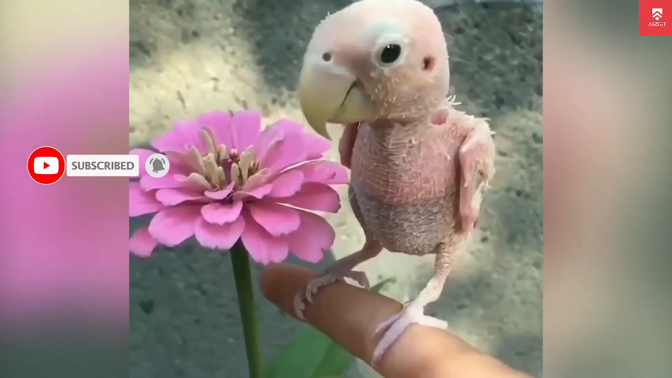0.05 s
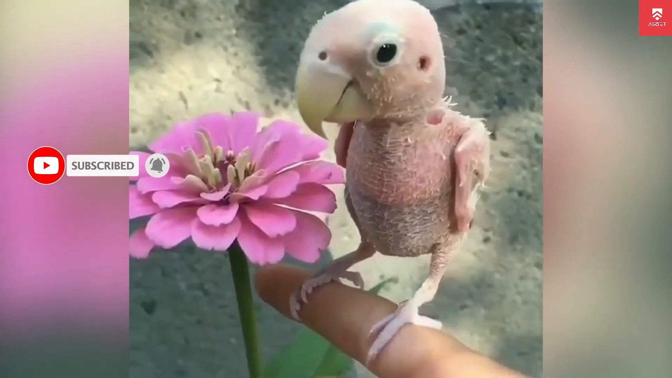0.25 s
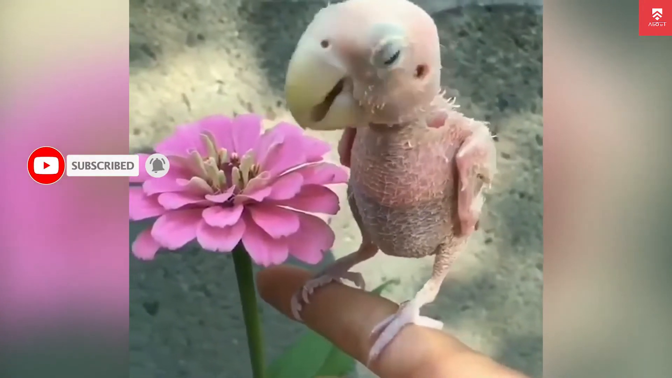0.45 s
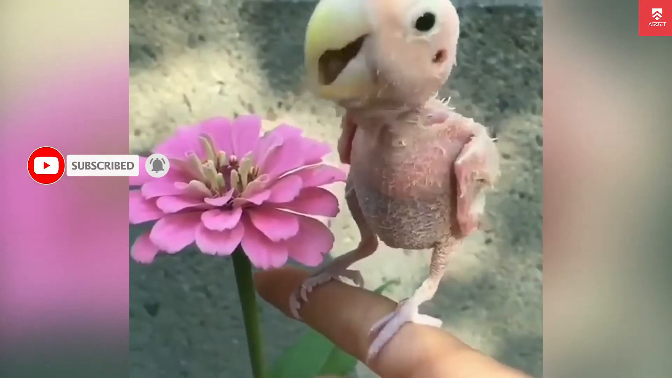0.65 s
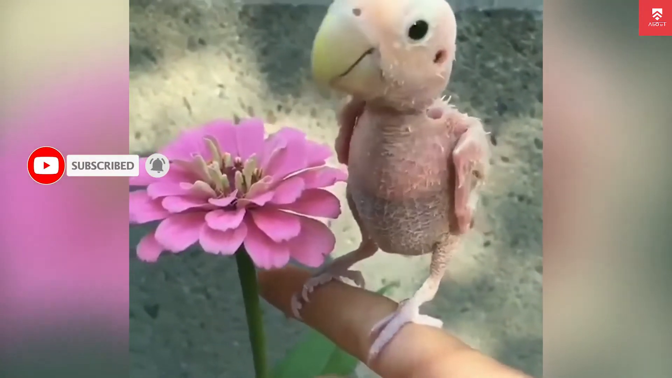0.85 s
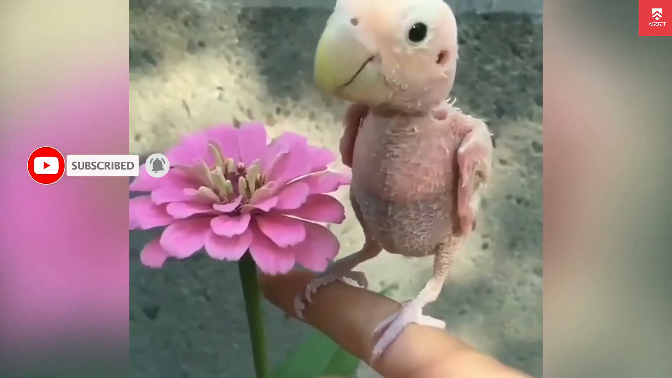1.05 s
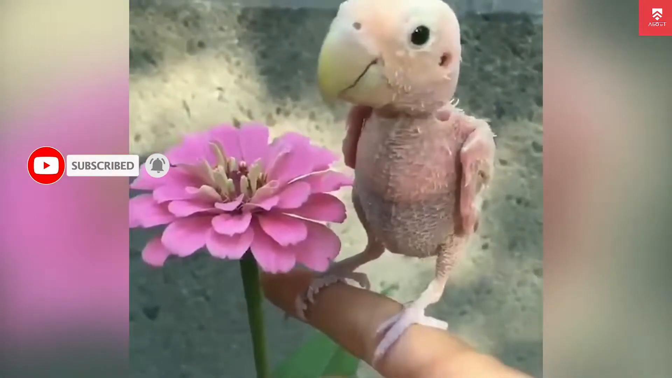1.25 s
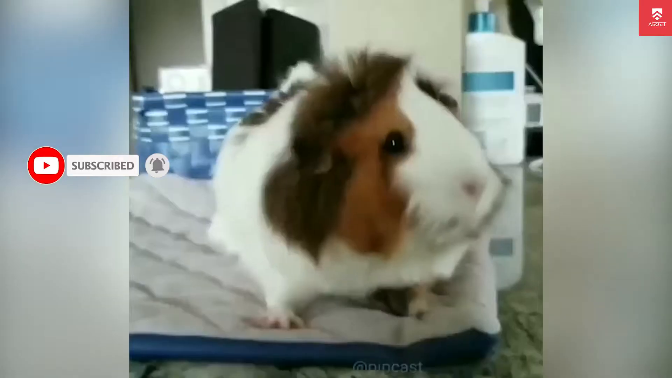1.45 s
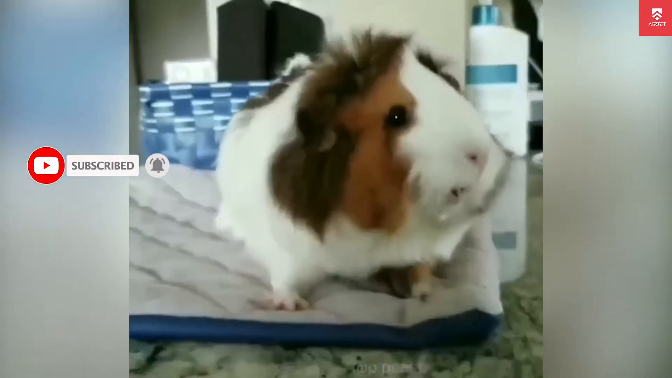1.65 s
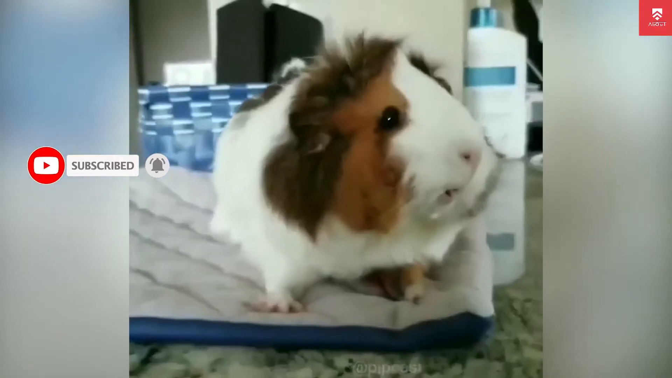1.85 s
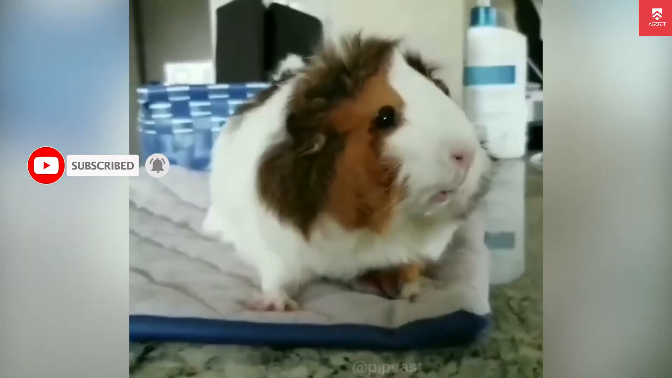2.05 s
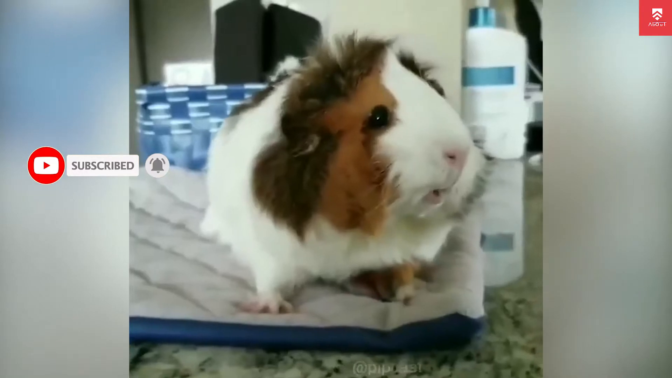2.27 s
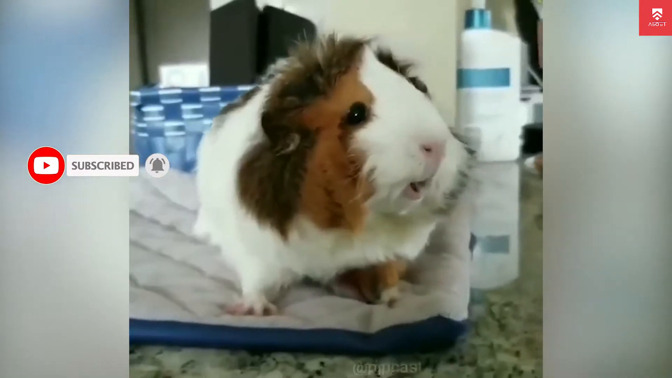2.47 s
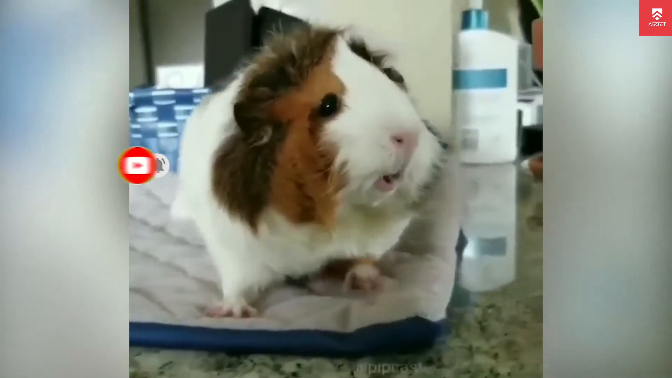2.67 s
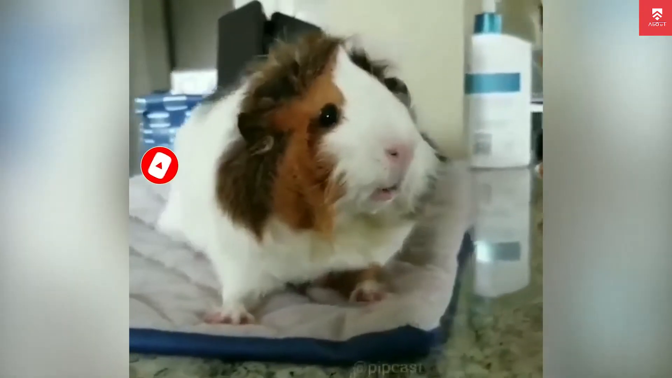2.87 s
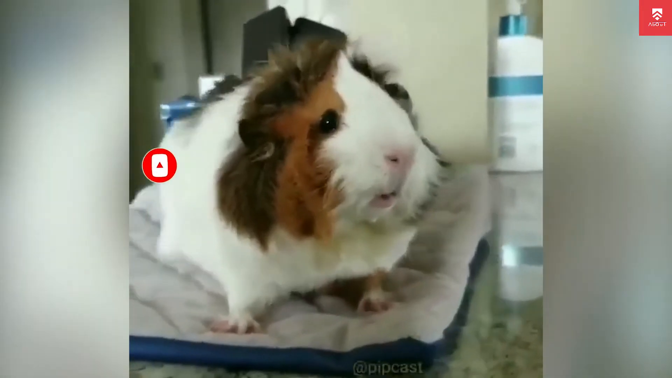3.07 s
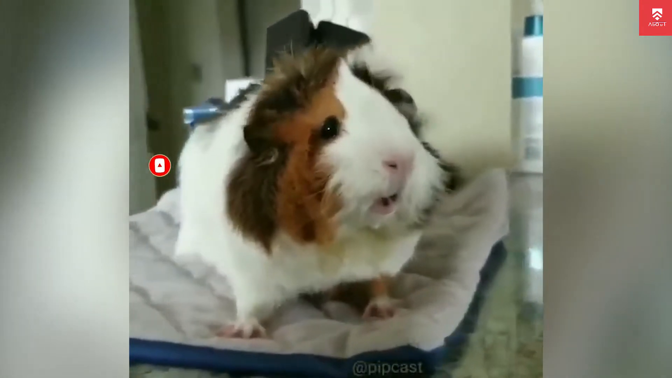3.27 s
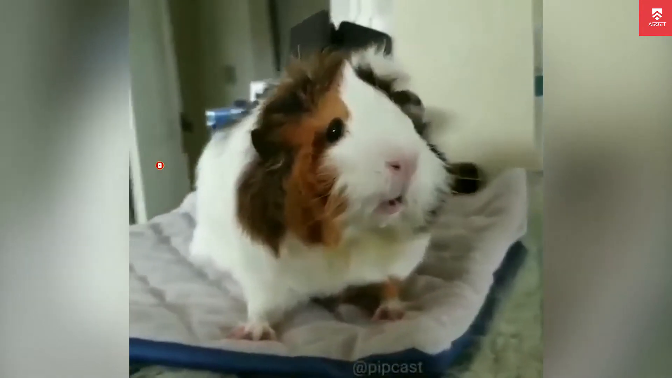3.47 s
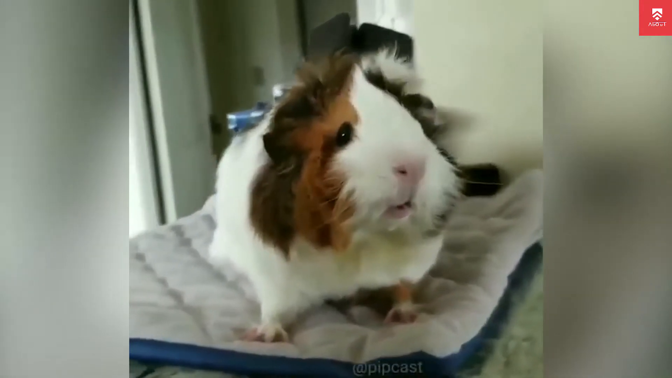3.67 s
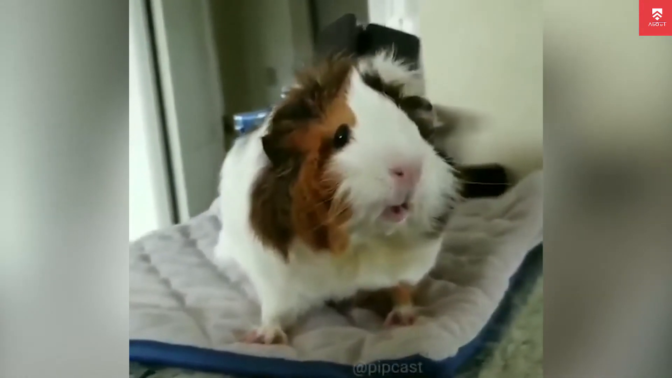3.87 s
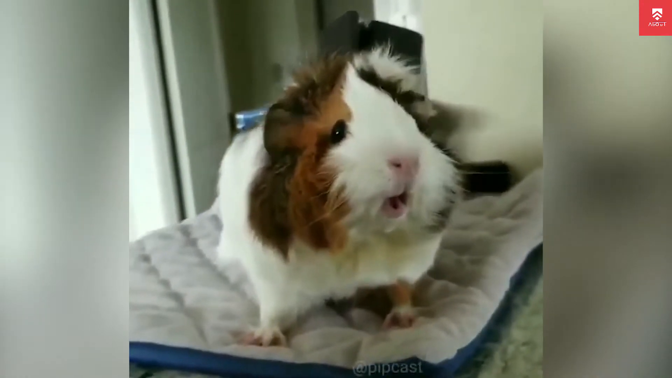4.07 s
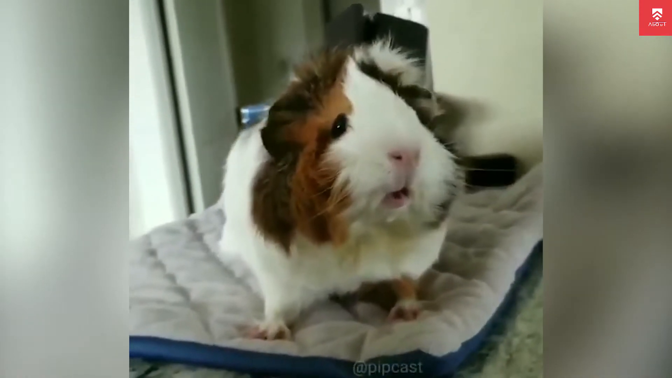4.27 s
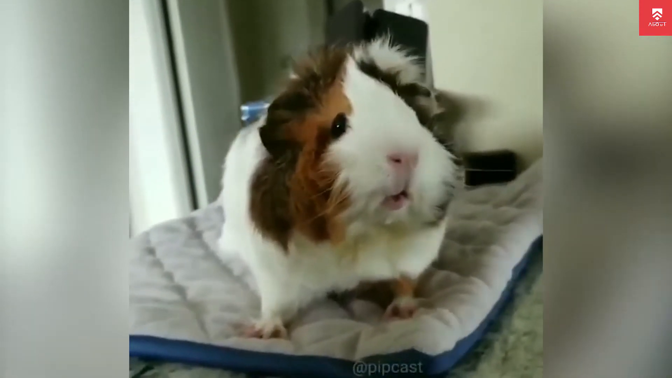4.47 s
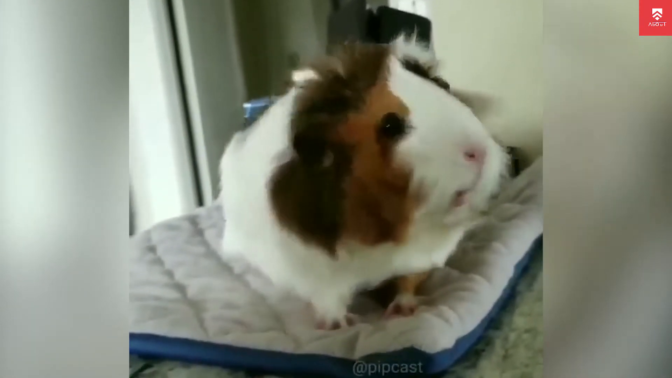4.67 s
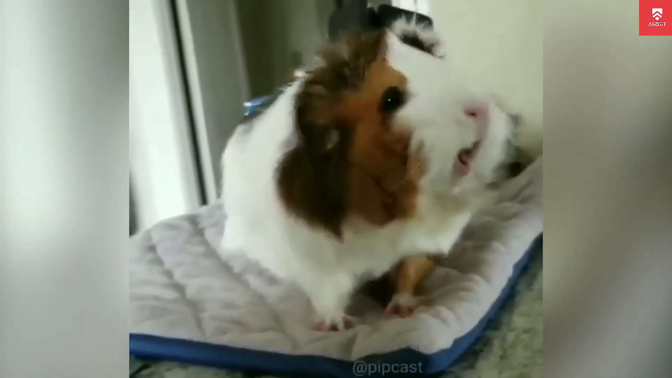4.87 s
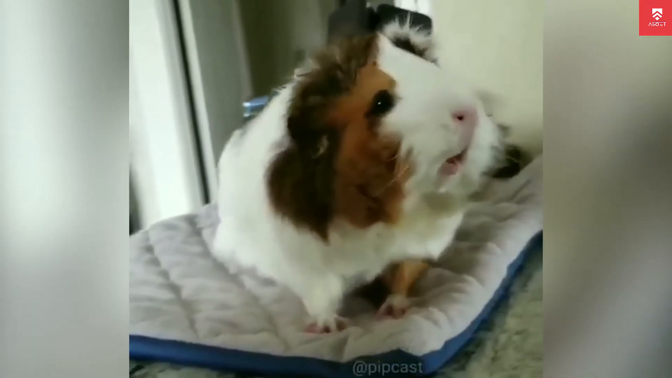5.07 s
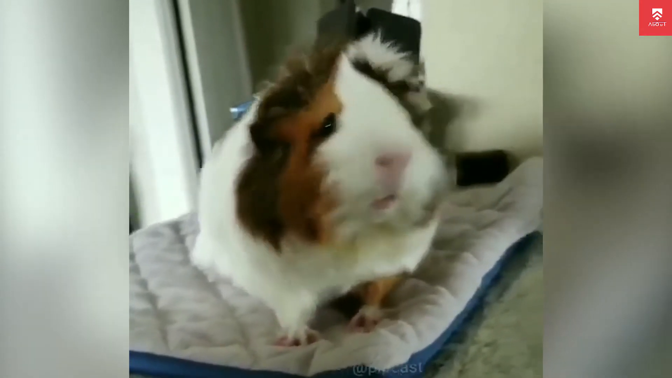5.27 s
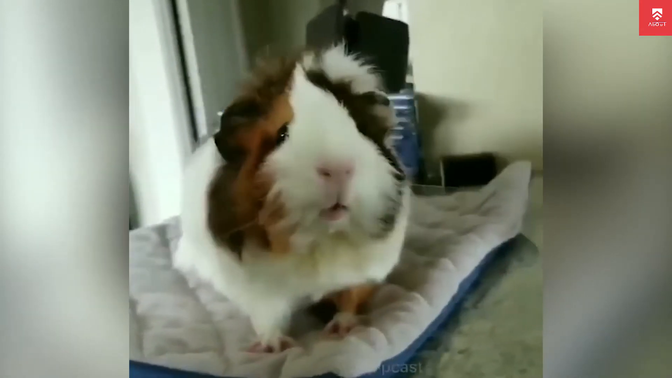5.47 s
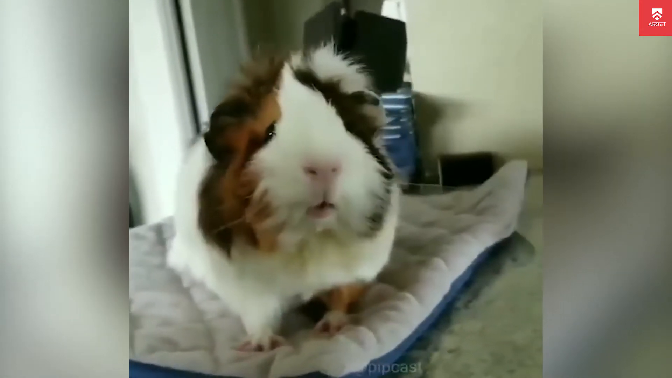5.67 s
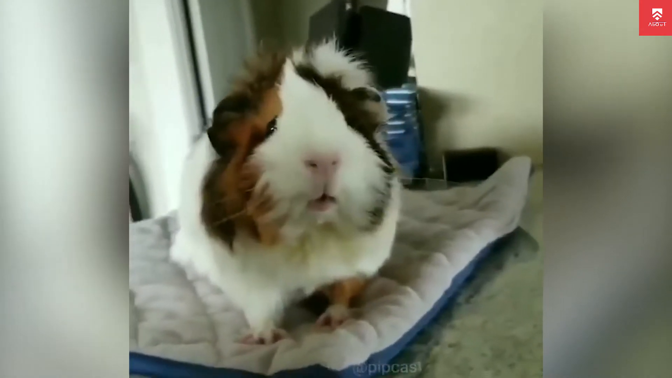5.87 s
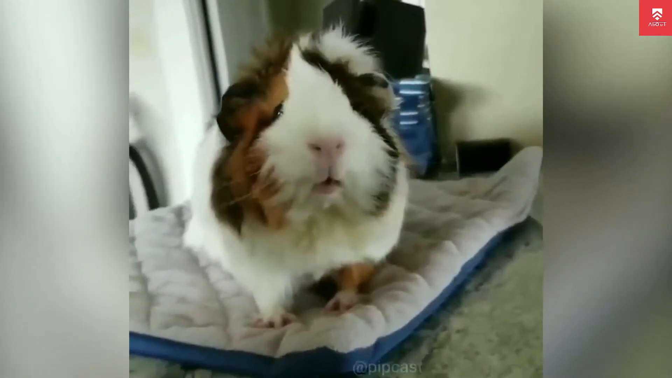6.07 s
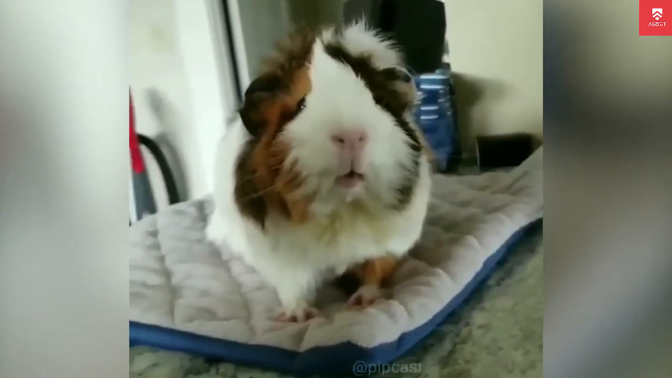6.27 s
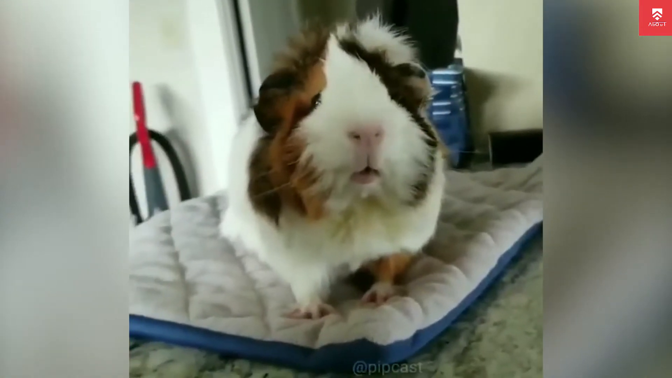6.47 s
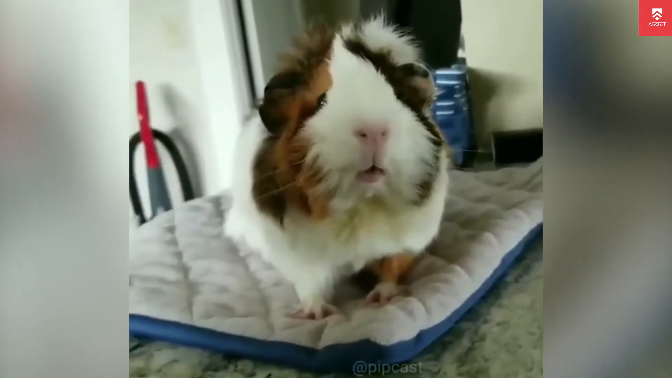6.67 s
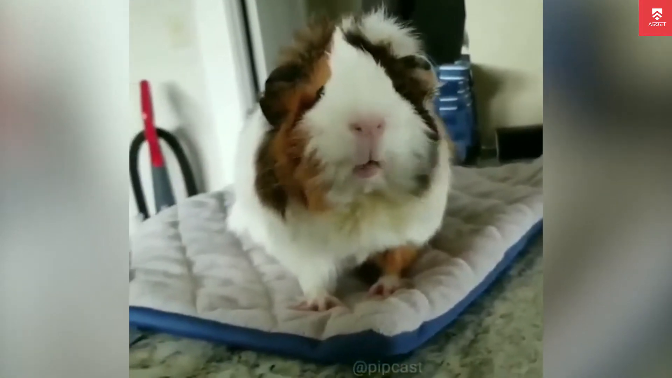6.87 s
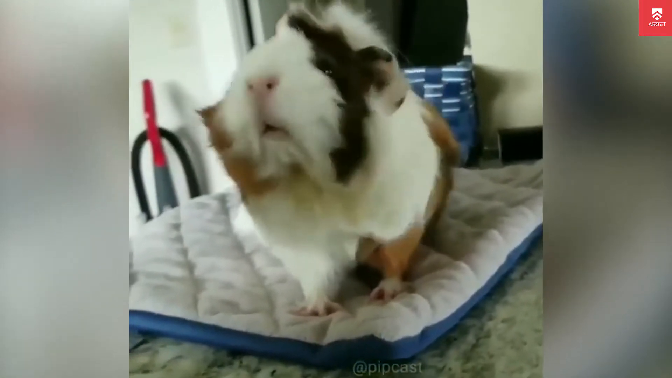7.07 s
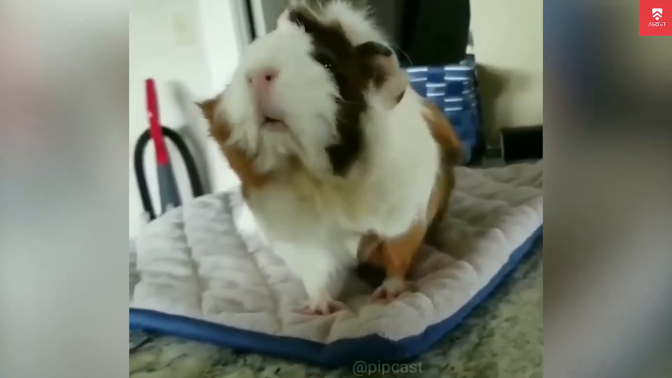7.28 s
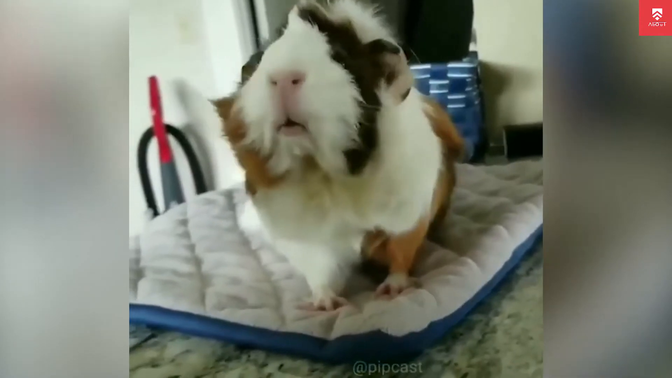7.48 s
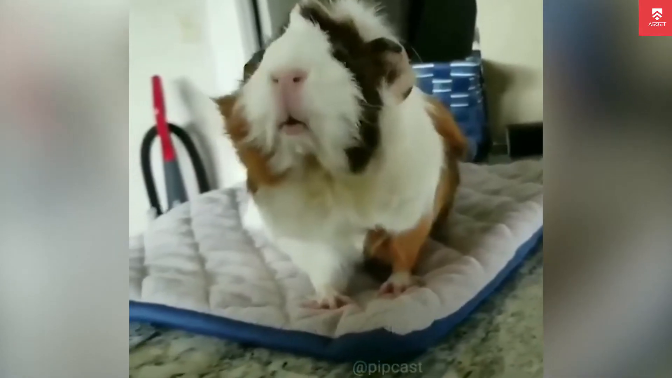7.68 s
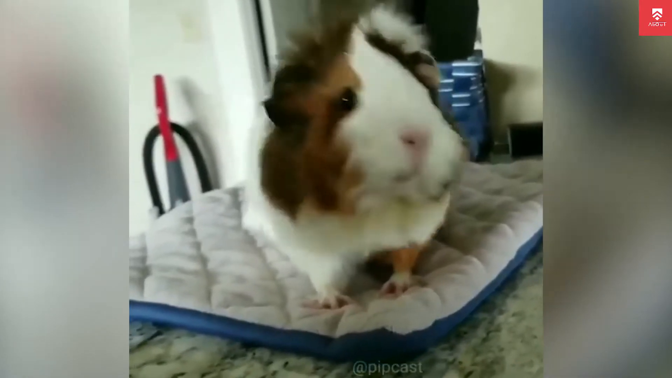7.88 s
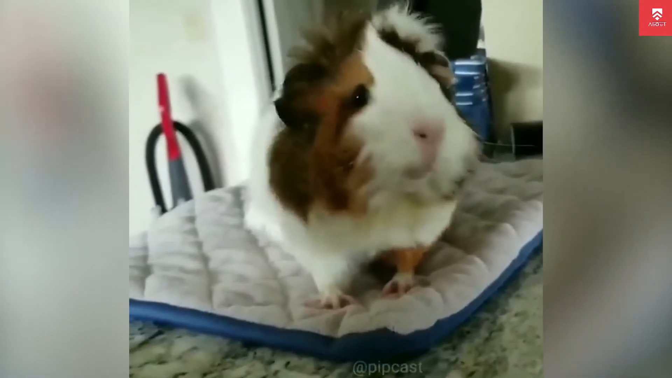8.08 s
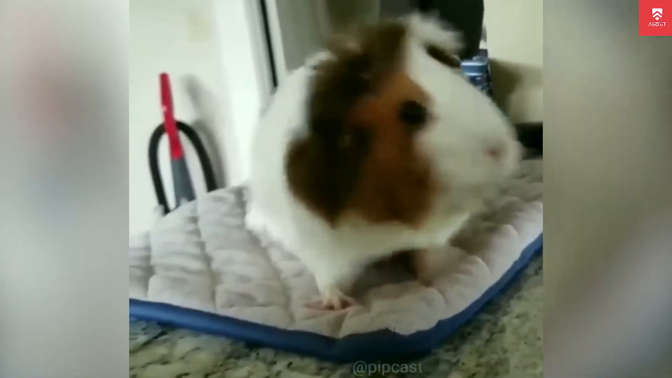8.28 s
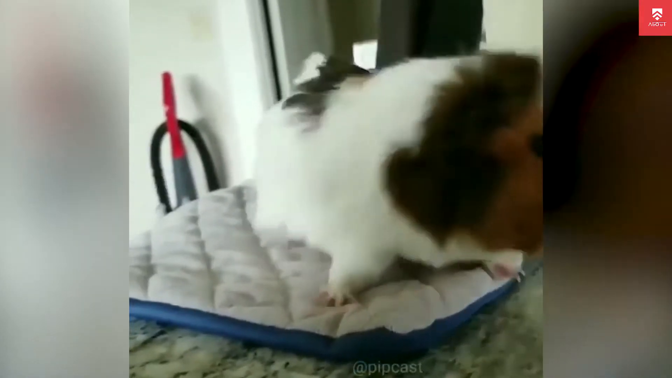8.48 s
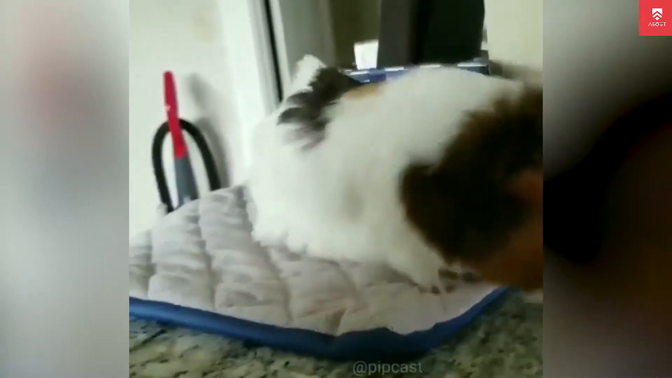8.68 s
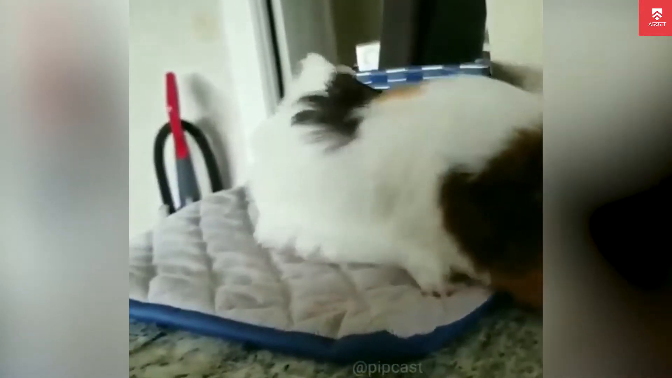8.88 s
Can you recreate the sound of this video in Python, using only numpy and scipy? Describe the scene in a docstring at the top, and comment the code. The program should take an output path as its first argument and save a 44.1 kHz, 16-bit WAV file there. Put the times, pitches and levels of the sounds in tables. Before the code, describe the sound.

Low outdoor rumble with a piercing bird squawk, a brief lull, then close guinea pig wheeks sweeping upward, fading into small chirps and claw scratches.

```python
"""A small parrot squawks once outdoors over a low rumble; after a short silence, a guinea pig on a mat
indoors whistles five loud rising wheeks and nine softer chirps, with shuffling and scratching on the cloth.
Both voices are stacks of sine waves on a moving pitch, shaped by a throat, with noise added around them.
Shaped noise makes the rumble, the room murmur, the rustling cloth and the short claw scratches."""
import sys
import numpy as np
from scipy import signal
from scipy.fft import rfft, irfft, next_fast_len
from scipy.io import wavfile
from scipy.ndimage import uniform_filter1d

SR = 44100
rng = np.random.default_rng(int(sys.argv[2]) if len(sys.argv) > 2 else 0)


def output_pcm(signal):
    """Save a mono or channel-first signal as 16-bit PCM at the path in sys.argv[1].

    Samples are clipped to [-1, 1] before scaling.
    """
    pcm = np.clip(np.atleast_2d(signal).T, -1, 1) * 32767
    wavfile.write(sys.argv[1], SR, np.round(pcm).astype(np.int16))


N = 393813

# how loud the outdoor rumble is: it drops during the squawk, then partly recovers: (time [s], level [dB])
OUTDOOR_RUMBLE = [(0.0, -40.5), (.266, -39.5), (.31, -39.5), (.346, -41.5), (.696, -41.5), (.724, -57.5),
                  (1.086, -52), (1.14, -47.5), (1.252, -50.5), (1.29, -48), (1.414, -45.5)]


def undb(db):
    """Turns decibels into a plain multiplier."""
    return 10 ** (np.asarray(db) / 20)


def unit(x):
    """Scales a sound to an average (RMS) level of 1."""
    return x / np.sqrt(np.mean(x ** 2))


def curve(table, edge_s=0.0011):
    """Columns joined by straight lines over time, and a gate that opens only over the table's span."""
    s, *columns = np.transpose(table)
    t = np.arange(N) / SR
    gate = np.clip(np.minimum(t - s[0], s[-1] + 2 * edge_s - t) / edge_s, 0, 1)
    return gate, [np.interp(t, s, c) for c in columns]


def passes(table, hz):
    """Reads the level in dB at a frequency from (Hz, dB) points."""
    table_hz, table_db = np.transpose(table)
    return np.interp(np.log(hz), np.log(table_hz), table_db)


def colour(x, spectrum):
    """Makes each frequency of a sound louder or softer by (Hz, dB) points."""
    size = next_fast_len(N)
    f = np.maximum(np.arange(size // 2 + 1) * SR / size, 1)
    return irfft(rfft(x, size) * undb(passes(spectrum, f)), size)[:N]


def walk(rate):
    """A random wandering value: a new target every 1 / rate seconds, joined by slopes, spread near 1."""
    hold = int(SR / rate)
    steps = np.repeat(rng.standard_normal(N // hold + 1), hold)
    return unit(uniform_filter1d(steps, hold)[:N])


def patchy(spectrum, flicker_db, rate):
    """Coloured noise whose octave bands flicker each on their own."""
    out = 0
    for hz in 30 * 2. ** np.arange(9):
        edges_hz = [hz / np.sqrt(2), min(hz * np.sqrt(2), .45 * SR)]
        sos = signal.butter(2, edges_hz, "bandpass", fs=SR, output="sos")
        band = signal.sosfilt(sos, rng.standard_normal(N))
        out = out + undb(flicker_db * walk(rate)) * band
    return unit(colour(out, spectrum))


def swells(rows):
    """Bell-shaped rises and falls of level, from (middle s, length s, dB) rows."""
    t = np.arange(N) / SR
    return sum(undb(db) * np.exp(-(2 * (t - s) / length) ** 4) for s, length, db in rows)


def echo(x, t60, top_hz, start_s):
    """Many blurred reflections: a noise tail that dies by 60 dB in t60 s, duller than the source."""
    t = np.arange(int(t60 * SR)) / SR
    tail = rng.standard_normal(N)[:len(t)] * np.exp(-np.log(1000) * t / t60) * (t > start_s)
    tail = signal.lfilter(*signal.butter(1, top_hz, fs=SR), tail)
    return signal.fftconvolve(x, tail / np.sqrt(np.sum(tail ** 2)))[:N]


def voice(notes, throat, fall_db, effort, reedy_hz, jitter, shimmer_db, drift_db, count, slew_s, firm_db,
          uneven=None):
    """Partials on a wavering pitch pass the throat; they fall off faster in soft calls, slower below reedy_hz."""
    # lines between the partials: (multiple of the pitch [times], depth under their layer [dB])
    half_lines = [(.5, 20), (1.5, -5), (2.5, 61), (3.5, 21)]
    quarter_lines = [(0.751, 3), (1.249, 9), (1.75, 3.5), (2.25, 11)]
    out = np.zeros(N)
    waver, shimmer = walk(300), undb(shimmer_db * walk(120))
    noise, drift = 1.3 * np.tanh(walk(900)), walk(20)
    half, quarter, rough = uneven or np.zeros((3, N))
    for note in notes:
        gate, (hz, db) = curve(note, edge_s=0.0013)
        on = gate > 0
        hz = uniform_filter1d(hz, int(slew_s * SR))  # the voice organ bends round corners
        hz = (hz * (1 + (jitter + 0.017 * rough) * waver))[on]
        db, chaos = db[on], noise[on]
        gate = (gate * shimmer)[on] * (1 + rough[on] * chaos)  # chaos blurs all lines
        phase = 2 * np.pi * np.cumsum(hz) / SR
        fall = (fall_db - effort * (db - firm_db)) * np.clip(hz / reedy_hz, .6, 1) ** 2  # dB an octave
        peak_db = db.max()
        base_db = db - throat(hz, hz, peak_db)
        partials = [(0.99, undb(db))]  # the lowest line sits 1 % flat
        for m in range(2, count + 1):
            own_drift = drift_db * np.roll(drift, m * SR)[on]  # each overtone drifts on its own
            overtone_db = base_db + throat(m * hz, hz, peak_db) - fall * np.log2(m) + own_drift
            partials.append((m, undb(overtone_db)))
        if uneven:  # unequal cycles put lines between the partials
            partials += [(m, half[on] * undb(-depth)) for m, depth in half_lines]
            partials += [(m, quarter[on] * undb(-depth)) for m, depth in quarter_lines]
        husk = np.clip((firm_db - db) / 40, 0, .5) * chaos  # a weakly driven voice has husky overtones
        for m, size in partials:
            size = size * np.abs(1 + husk * max(m - 1, 0)) * (m * hz < .4 * SR)
            out[on] += np.sqrt(2) * gate * size * np.sin(m * phase)
    return out


def guinea_pig():
    """Clean whistles with a little noise around the lines, in a small hard room."""
    # one table for each call: (time [s], pitch [Hz], level of the lowest partial [dB])
    wheeks = [
        [(1.485, 1577, -55.5), (1.535, 2114, -26.5), (1.571, 2340, -21), (1.629, 2543, -28), (1.67, 2700, -31),
         (1.685, 2700, -21), (1.692, 3005, -26.5), (1.728, 3250, -25), (1.794, 3490, -26), (1.841, 3770, -33),
         (1.862, 3770, -34)],
        [(2.018, 541, -39), (2.05, 493, -34.5), (2.116, 1232, -35.5), (2.138, 1461, -47), (2.215, 1730, -36.5),
         (2.285, 2127, -22), (2.36, 2280, -18.5), (2.41, 2380, -20.5), (2.45, 2500, -24.5),
         (2.504, 2594, -27.5), (2.514, 2970, -27), (2.53, 2870, -21), (2.542, 3340, -28), (2.661, 3650, -31.5),
         (2.686, 3670, -31.5)],
        [(2.792, 532.5, -36), (2.83, 538, -30.5), (2.884, 856, -37), (2.93, 1314, -34.5), (2.973, 1490, -43),
         (3.051, 2152, -23), (3.109, 2306, -21.5), (3.159, 2393, -23), (3.2, 2522, -21.5), (3.218, 2904, -26),
         (3.24, 3296, -27.5), (3.27, 3415, -24), (3.355, 3453, -23), (3.374, 3590, -27.5)],
        [(3.528, 612, -40.5), (3.56, 541, -32.5), (3.59, 657, -38.5), (3.64, 1288, -36.5), (3.72, 1516, -45),
         (3.849, 2087, -25), (3.955, 2290, -21), (3.993, 2417, -17), (4.075, 2521, -20.5), (4.096, 2710, -23.5),
         (4.102, 3260, -26), (4.138, 3535, -21.5), (4.189, 3820, -23.5), (4.197, 3640, -45)],
        [(4.338, 584, -45), (4.366, 527.6, -31.5), (4.396, 617, -38), (4.48, 1465, -43), (4.55, 1632, -34.5),
         (4.611, 1832, -32.5), (4.657, 2230, -21), (4.7, 2388, -21.5), (4.75, 2510, -18), (4.803, 2873, -23),
         (4.815, 3410, -23.5), (4.828, 3640, -29.5), (4.867, 3646, -23), (4.919, 3654, -28.5)],
        [(5.155, 537, -41.5), (5.189, 469, -36), (5.235, 637, -39.5), (5.265, 892, -40.5), (5.341, 1223, -39),
         (5.447, 1396, -46), (5.563, 1338, -43), (5.627, 1223, -39.5), (5.661, 1300, -45), (5.685, 1627, -56)],
        [(5.9, 624, -49.5), (5.928, 597, -44), (5.958, 685, -45.5), (6.002, 1100, -43), (6.052, 1160, -43),
         (6.162, 1278, -43), (6.19, 1330, -46)],
        [(6.348, 634, -44), (6.38, 594, -38.5), (6.406, 683, -41.5), (6.44, 1040, -43), (6.49, 1085, -41),
         (6.622, 1323, -40.5), (6.66, 1420, -52)],
        [(6.8, 655, -43.5), (6.828, 573, -40.5), (6.852, 622, -40), (6.922, 1057, -42), (6.964, 1230, -41.5),
         (7.002, 1630, -49), (7.05, 1644, -55), (7.065, 1640, -48), (7.1, 1770, -55)],
        [(7.19, 667, -44), (7.23, 548, -39), (7.27, 721, -43.5), (7.294, 1103, -45), (7.324, 1600, -49),
         (7.335, 1600, -65)],
        [(7.69, 577, -47), (7.72, 509, -44), (7.748, 610, -44.5), (7.79, 1090, -45.5), (7.86, 1175, -40),
         (7.9, 1410, -43.5)],
        [(8.02, 622, -42.5), (8.048, 547, -40.5), (8.07, 626, -42.5), (8.112, 1106, -42), (8.164, 1232, -39),
         (8.298, 1370, -45), (8.318, 1427, -44.5), (8.362, 1970, -48.5), (8.385, 1943, -52)],
        [(8.49, 598, -40), (8.53, 565, -40.5), (8.552, 797, -37.5), (8.59, 1424, -40)],
        [(8.88, 575, -47), (8.894, 558, -37.5), (8.93, 603, -41.5)],
    ]
    # colour of the room's echo: (frequency [Hz], level [dB])
    room = [(300, -8.5), (1200, -5.5), (2000, -8), (2600, 0), (3300, -6.5), (5500, -8.5), (13000, -4.5)]
    call = voice(wheeks, mouth, fall_db=13, effort=0.061, reedy_hz=703, jitter=0.0051, drift_db=2.0,
                 shimmer_db=1.02, count=8, slew_s=0.0072, firm_db=-39.5, uneven=registers())
    halo = call * (undb(-27.5) * walk(700) + undb(-50.5) * walk(3500))  # narrow noise surrounds each partial
    reflections = colour(echo(call, 0.4, 8700, 0.004), room)
    return call + halo + puffs() + undb(-10.5) * reflections


def mouth(hz, pitch_hz, peak_db):
    """What reaches the air at hz: in loud calls the mouth opens as the pitch climbs."""
    # what the throat and open mouth let through: (frequency [Hz], level [dB])
    open_mouth = [(500, 4.5), (1100, 4.5), (1700, -7.5), (2400, -1), (3500, -8.5), (5100, 14.5),
                  (6900, -0.5), (9000, -1.5), (11000, -1), (13500, -16)]
    # the same with the mouth nearly shut: (frequency [Hz], level [dB])
    shut_mouth = [(500, 2.5), (1100, 1.5), (1700, -9), (2600, 2), (3300, -4), (4000, 5), (5200, -6),
                  (7000, -17), (13500, -22)]
    opens_from_hz, open_at_hz, loud_db = 1000, 1600, -29
    opening = np.clip((pitch_hz - opens_from_hz) / (open_at_hz - opens_from_hz), 0, 1) * (peak_db > loud_db)
    return opening * passes(open_mouth, hz) + (1 - opening) * passes(shut_mouth, hz)


def registers():
    """Strength of alternating cycles, four-cycle patterns and chaos where the voice breaks upward."""
    # each row holds two groups, the times of a break into the upper register and its strengths:
    # (break [s], end of call [s], cycles alternate from [s], until [s]),
    # (every-2nd-cycle level [dB], every-4th-cycle level [dB], chaos [dB])
    breaks = [ ((1.688, 1.862, 1.815, 1.845), (-26, -44, -15)), ((2.512, 2.686, 2.535, 2.68),
              (-27, -37.5, -17.5)), ((3.21, 3.374, 3.24, 3.35), (-56, -51, -38)),
              ((4.098, 4.197, 4.128, 4.16), (-26, -41, -26)), ((4.803, 4.919, 4.812, 4.905),
              (-32, -34, -19)), ]
    chaos_db, chaos_s = -5, 0.0096  # irregular cycles at the break and the end, and their time to settle
    t, half, quarter, rough = np.arange(N) / SR, np.zeros(N), np.zeros(N), np.zeros(N)
    for (start, end, first, last), (half_db, quarter_db, calm_db) in breaks:
        edges = np.exp(-np.abs(t - start) / chaos_s) + np.exp(-np.abs(t - end) / chaos_s)
        upper = np.clip(np.minimum(t - start, end - t) / 0.0055, 0, 1)
        half += undb(half_db) * np.clip(np.minimum(t - first, last - t) / 0.01, 0, 1)
        quarter += undb(quarter_db) * upper * (0.62 + edges)
        rough += undb(chaos_db) * edges + undb(calm_db) * upper
    return half, quarter, rough


def puffs():
    """Raspy breath noise that swells quickly as each call opens, then fades as the whistle takes hold."""
    # one puff a call, levels relative to each other: (start [s], strength [dB])
    puff_rows = [(1.4865, -25), (2.0288, -31), (2.7964, -20.5), (3.5294, -25.5), (4.3306, -27.5),
                 (5.1564, -22.5), (5.9024, -57), (6.354, -39), (6.803, -42), (7.1935, -39), (7.6779, -44),
                 (8.0194, -43), (8.4944, -33), (8.8872, -35)]
    swell_s, fade_t60_s = 0.016, 0.61
    t, level = np.arange(N) / SR, np.zeros(N)
    for s, strength_db in puff_rows:
        age = np.maximum(t - s, 0)
        level += undb(strength_db) * np.minimum(age / swell_s, 1) * np.exp(-np.log(1000) * age / fade_t60_s)
    air = unit(colour(rng.standard_normal(N), [(700, -18), (1500, -1), (2500, -11), (4200, -4.5),
                                               (6500, -18.0), (10000, -19)]))
    return undb(-16 + 0.77 * walk(500)) * level * air


def parrot():
    """Short whistled notes that jump in pitch, over grainy rasp; far walls return a long faint ring."""
    # one table for each note: (time [s], pitch [Hz], level of the lowest partial [dB])
    squawk = [
        [(.608, 1842, -27.5), (.614, 1914, -20), (.622, 2094, -23.5), (.627, 2680, -27), (.631, 2090, -23),
         (.643, 2140, -30)],
        [(.643, 4910, -3.5), (.648, 5516, -5), (.66, 5600, -7), (.668, 5510, -13)],
        [(.663, 6580, -9.5), (.673, 6830, -8), (.681, 6240, -9)],
        [(.683, 5170, -1), (.687, 4270, -10), (.69, 3900, -22)],
        [(.691, 3240, -18), (.7, 3140, -14), (.71, 3165, -20)],
        [(.71, 3770, -14), (.716, 3860, -3.5), (.724, 3624, -11), (.732, 3636, -14.5), (.755, 3628, -11.5),
         (.761, 3676, -20)],
        [(.765, 3720, -14), (.773, 3570, -15.5), (.779, 3750, -33.5)],
        [(.783, 3590, -9), (.79, 3524, -20), (.797, 3790, -23), (.806, 3670, -32)],
        [(.797, 2690, -22.5), (.806, 2540, -37), (.814, 2685, -24.5), (.824, 3130, -25.5)],
        [(.825, 3870, -11), (.833, 3834, -13), (.842, 3686, -13.5), (.85, 3340, -32.5), (.858, 3530, -47.5)],
    ]
    # air rasping through the syrinx (the bird's voice organ), before a boost: (time [s], level [dB])
    rasp_curve = [(0.6, -59.5), (0.62, -24), (0.672, -43.5), (0.684, -32.5), (0.738, -53.5), (0.822, -37.5),
                  (0.88, -79)]
    # colour of the rasp: (frequency [Hz], relative level [dB per Hz])
    beak = [(530, -84), (900, -61.5), (2870, -27), (3700, -22), (4540, -23), (7190, -17.5), (11300, -27),
            (14000, -39)]
    # what the parrot's throat lets through: (frequency [Hz], level [dB])
    syrinx = [(2000, -6.5), (3150, -3), (3700, 3), (5500, -1.5), (6300, -2), (7300, -8.5), (10500, -16),
              (14000, -13)]
    gate, (rasp_db,) = curve(rasp_curve, edge_s=.001)
    hiss = unit(colour(rng.standard_normal(N), beak))
    rasp = gate * undb(rasp_db + 11.5 + 3.5 * walk(350)) * hiss
    notes = voice(squawk, lambda hz, *_: passes(syrinx, hz), fall_db=5, effort=.05, reedy_hz=2994,
                  drift_db=1.0, jitter=0.009, shimmer_db=0.3, count=6, slew_s=.001, firm_db=-8.5)
    call = notes * (1 + undb(rasp_db + 11.0) * walk(900)) + rasp  # the rasping air also chops the notes
    near = echo(call, 0.031, 7000, .004)
    far = colour(echo(call, 2.5, 9000, .03), [(2000, -15), (3700, 0), (5500, -14), (9000, -20)])
    return call + undb(-16.5) * near + undb(-48.0) * far


def scratches():
    """Claws catch the cloth: a sharp tick, a grainy tail and a duller thud."""
    # levels relative to each other; the first scratch falls in the outdoor part:
    # (start [s], strength [dB], time to die by 60 dB [s], thud against strength [dB])
    catches = [(1.1695, -56, 0.042, -7), (5.078, -31, 0.062, -21), (5.2733, -38, 0.04, -11),
               (6.0734, -45, 0.04, -46), (6.1945, -50, 0.055, -16), (7.2529, -43, 0.033, -6),
               (7.3367, -38, 0.04, -17), (7.3521, -24, 0.093, -4), (7.3614, -34, 0.061, -18),
               (7.3697, -22, 0.05, -2), (7.457, -29, 0.13, -6), (7.5322, -30, 0.05, -13),
               (7.646, -39, 0.04, -26), (7.7767, -42, 0.067, -5), (7.8496, -30.5, 0.064, -14),
               (7.9842, -34, 0.035, -25), (8.0384, -25.5, 0.027, 0.5), (8.117, -21.5, 0.04, -16),
               (8.156, -23.5, 0.12, -15), (8.268, -27, 0.053, -11), (8.3279, -29.5, 0.045, -7.5),
               (8.7857, -30, 0.04, -26), (8.8793, -30, 0.044, -10.5)]
    t, sharp, dull = np.arange(N) / SR, np.zeros(N), np.zeros(N)
    for s, strength_db, t60, thud_db in catches:
        burst = (t >= s) * np.exp(-np.log(1000) * np.abs(t - s) / max(t60, .005))
        sharp += undb(strength_db) * (burst ** 3 + undb(-9) * burst)  # quick tick, then softer tail
        dull += undb(strength_db + thud_db) * burst
    thud = unit(colour(rng.standard_normal(N), [(60, 10), (200, -10), (600, 6.5), (1500, -8), (4000, -7)]))
    claw = unit(colour(rng.standard_normal(N), [(500, -29), (2000, -15), (5000, 14), (8000, -1),
                                                (12500, -29), (13500, -26)]))
    return undb(-11.5) * sharp * claw + undb(-6) * dull * thud


def rustle(loud):
    """Grainy noise from fur and feet on the mat, plus an airy hiss that follows the call's level."""
    # fur stirring on the mat, before the graininess: (time [s], level [dB])
    shuffle = [(1.48, -45), (1.9, -51.5), (2.14, -43.5), (3.46, -46), (3.71, -37.5), (4.28, -46.5),
               (4.5, -36), (5.1, -54.5), (5.4, -52), (5.69, -59), (5.85, -82.5), (6.1, -73), (6.31, -57),
               (6.45, -46), (6.8, -52), (7.1, -54), (7.45, -45), (7.6, -52), (7.97, -44), (8.42, -43.5),
               (8.49, -53.5), (8.7, -54.5), (8.93, -46)]
    # feet brushing the mat, before the graininess: (middle [s], length [s], level [dB])
    brushes = [(5.082, 0.047, -48.5), (5.19, 0.12, -50), (5.28, 0.056, -44), (6.2, 0.057, -51.5),
               (6.4, 0.084, -48.5), (6.562, 0.095, -50.5), (6.7, 0.16, -49), (7.23, 0.12, -46.5),
               (7.367, 0.05, -33.5), (7.53, 0.064, -46), (7.986, 0.0058, -35.5), (8.116, 0.007, -46),
               (8.15, 0.065, -39), (8.542, 0.068, -37.5), (8.73, 0.038, -50), (8.788, 0.012, -62)]
    # colour of the rustling noise as heard, with a dip near 8.7 kHz:
    # (frequency [Hz], relative level [dB per Hz])
    rustle_colour = [(88, -62), (150, 0), (418, -9), (496, -8.5), (623, -12), (1210, -6.5), (5960, -1.5),
                     (7340, -3.5), (8710, -19), (12300, 4), (14000, -55.5)]
    hiss_db, hiss_slew_s = -26.5, 0.16  # hiss against the level of the call, and its smoothing
    _, (stir_db,) = curve(shuffle)
    hiss = undb(hiss_db) * uniform_filter1d(loud, int(hiss_slew_s * SR))
    grains_db = 1.7 * walk(250) + 1.11 * walk(60)  # fibres catch and let go
    level = undb(stir_db) + swells(brushes) + hiss
    return level * undb(grains_db) * patchy(rustle_colour, flicker_db=4.5, rate=41)


def murmur():
    """Low room noise that flickers and now and then swells."""
    # swells of the murmur: (middle [s], length [s], level [dB])
    murmur_swells = [(1.68, 0.39, -40.5), (2.44, 0.18, -40), (2.85, 0.086, -52), (3.08, 0.26, -44.5),
                     (3.64, 0.081, -47.5), (4.02, 0.14, -49), (4.24, 0.11, -51), (4.76, 0.045, -42),
                     (5.21, .1, -60), (7.375, 0.07, -35.5)]
    # colour of the room's air: (frequency [Hz], relative level [dB per Hz])
    room_air = [(15, -57), (25, -9.5), (160, -3.5), (425, -9), (892, -21), (1020, -25), (1260, -20.5),
                (1730, -18), (4140, -25.5), (12300, -52), (14000, -58)]
    steady_db = -56.5
    return (undb(steady_db) + swells(murmur_swells)) * patchy(room_air, flicker_db=4.0, rate=8.4)


def indoors():
    """The guinea pig over murmur and rustle; the phone turns these two down under a loud call."""
    starts_s = 1.48
    gate = np.clip((np.arange(N) / SR - starts_s) / 0.0018, 0, 1)
    call = .45 * np.tanh(guinea_pig() / .45)  # the microphone rounds the peaks
    call = signal.sosfilt(signal.butter(2, 300, "highpass", fs=SR, output="sos"), call)
    loud = np.sqrt(uniform_filter1d(call ** 2, int(0.051 * SR)) + 1e-12)  # running level of the call
    duck = 1 / (1 + (loud / undb(-34)) ** 0.79)
    return gate * (duck ** 0.44 * murmur() + duck * rustle(loud) + call)


def garden():
    """Flickering low rumble, lighter air noise above it and a thin steady tone."""
    # colour of the outdoor noise: (frequency [Hz], relative level [dB per Hz])
    outdoor_colour = [(15, -50), (25, -22.5), (48, -4), (107, -2), (187, -21), (1260, -33), (1400, -33.5),
                      (1510, -36.5), (2710, -41), (3730, -50), (8690, -60), (14000, -71.5)]
    # a far tone of steady pitch: (time [s], level [dB])
    whine = [(0.0, -57.5), (.248, -64), (.392, -56.5), (.654, -71.5), (.974, -100), (1.425, -67)]
    whine_hz, air_db = 1391, -13  # air noise is set against the rumble
    gate, (rumble_db,) = curve(OUTDOOR_RUMBLE)
    _, (tone_db,) = curve(whine)
    tone_phase = 2 * np.pi * np.cumsum(whine_hz * (1 + 0.0011 * walk(5))) / SR
    tone = np.sqrt(2) * undb(tone_db) * np.sin(tone_phase)
    noise = patchy(outdoor_colour, flicker_db=2.5, rate=9)
    rumble = signal.sosfiltfilt(signal.butter(2, 220, fs=SR, output="sos"), noise)
    air = unit(noise - rumble)
    return gate * (undb(rumble_db) * (unit(rumble) + undb(air_db) * air) + tone)


def scene():
    """The outdoor part, in which the parrot is heard, then the indoor part, with scratches over both."""
    outdoors, _ = curve(OUTDOOR_RUMBLE)
    return (indoors() + outdoors * parrot() + scratches() + garden())[None]


def record(dry):
    """The phone rounds the loudest peaks and cuts the top."""
    top_hz = 13900
    rounded = .8 * np.tanh(dry / .8)
    return signal.sosfilt(signal.ellip(10, .2, 90, top_hz, fs=SR, output="sos"), rounded)


dry = scene()
out = record(dry)
output_pcm(out)
```